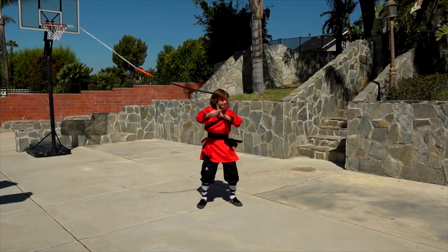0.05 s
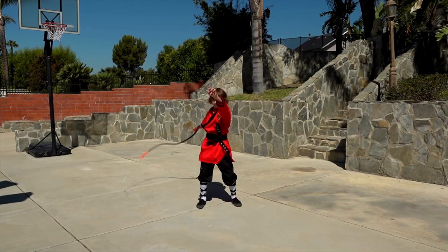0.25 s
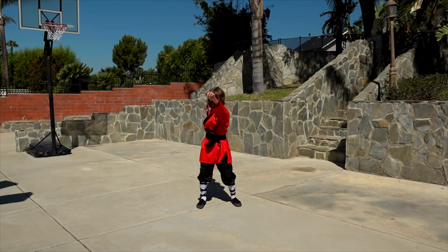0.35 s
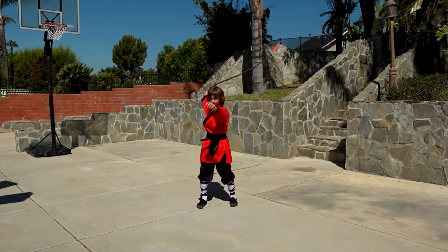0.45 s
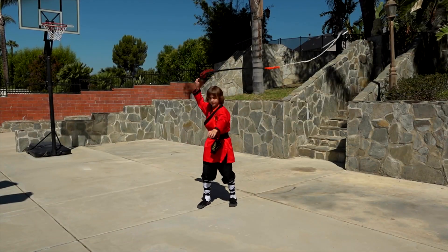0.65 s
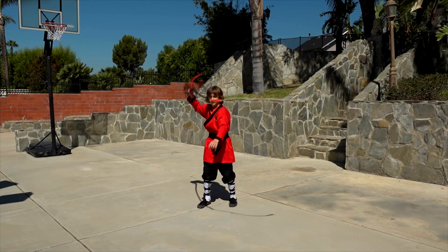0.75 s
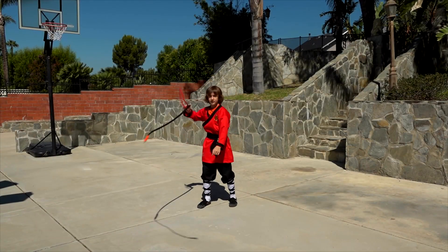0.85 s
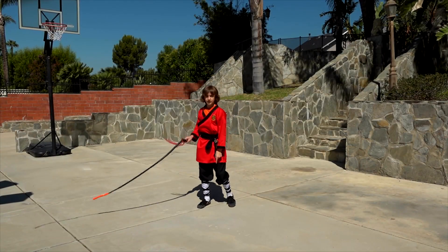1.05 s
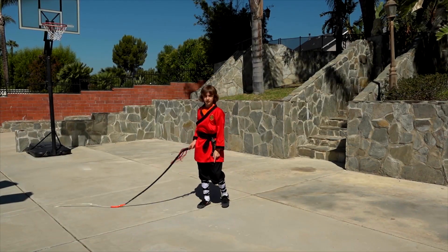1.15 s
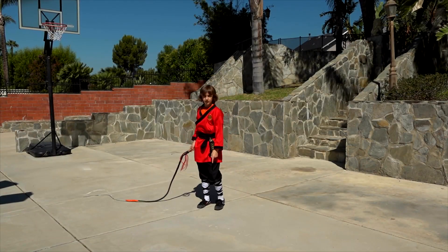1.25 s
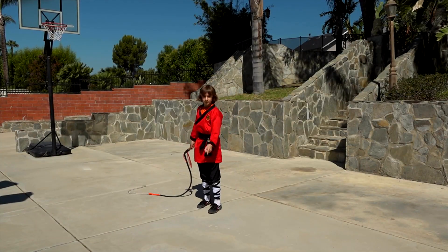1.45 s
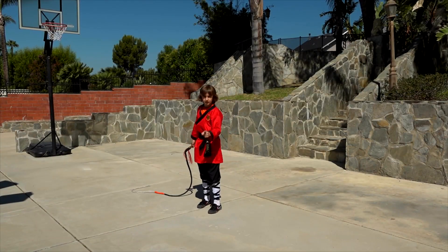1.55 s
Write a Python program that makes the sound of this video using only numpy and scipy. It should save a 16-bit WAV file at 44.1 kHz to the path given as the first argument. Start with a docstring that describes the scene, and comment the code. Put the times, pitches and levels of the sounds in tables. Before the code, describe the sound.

A whip swishes and cracks once, loud enough to overload the microphone, and echoes around a walled concrete yard. The lash then drops, faintly scuffing and tapping on the ground, over a low motor hum and light wind.

```python
"""A walled concrete yard: the echo of an earlier, duller crack dies over a wavering motor hum, light
wind and faint hiss. A whip lash rushes up and cracks at 0.23 s, overloading the microphone; the walls
ring on and farther walls send two late echoes. Two faint far-off tones swell just after 1 s.
From 1.23 s the lash drops on the concrete: it drags, scuffs, taps, and its heavier end knocks."""
import sys
import numpy as np
from scipy import signal
from scipy.fft import rfft, irfft
from scipy.io import wavfile

SR = 44100
rng = np.random.default_rng(int(sys.argv[2]) if len(sys.argv) > 2 else 0)


def store_pcm(level_fs):
    """Save levels as 16-bit WAV."""
    pcm = np.round(np.clip(level_fs, -1, 1) * 32767).astype(np.int16)
    wavfile.write(sys.argv[1], SR, np.atleast_2d(pcm).T)


N = 70560
TIME_S = np.arange(N) / SR
CONTACT_S = TIME_S[:8192]  # time axis of one ground contact

# yard decay: f/Hz, T60/s
YARD_T60 = [(60, .4), (250, 0.61), (1000, 0.62), (3000, .68), (6000, .62), (9000, 0.49), (12000, 0.48),
            (16000, 0.43)]
# echo spectrum of the earlier crack: f/Hz, level/dB
EARLY_ECHO_SPECTRUM = [(120, -53), (200, -18), (537, -7), (634, -18), (897, -7.5), (1940, -11),
                       (4250, -2.5), (9510, -19), (15900, -44)]
# motor partials: harmonic number, level/dB
HUM_PARTIALS = [(1, -49), (2, -37.5), (3, -53.5), (4, -49), (5, -61), (6, -57.5)]
# wind rumble: f/Hz, level/dB
WIND_SPECTRUM = [(12, -35.5), (22, -3.5), (55, 0.5), (100, -13), (200, -34.5), (400, -61.5)]
# wind envelope: t/s, level/dB
WIND_ENVELOPE = [(0.0, -33.5), (0.208, -44), (0.404, -35), (0.53, -33.5), (0.68, -41), (0.854, -39.5),
                 (1.06, -30.5), (1.136, -31.5), (1.6, -34)]
# outdoor hiss: f/Hz, level/dB
HISS_SPECTRUM = [(71, -36.5), (120, -3.5), (362, -18), (523, -20), (655, -19.5), (755, -22), (1290, -24.5),
                 (8090, -43), (15900, -50)]
# lash rushing up to the crack: t/s, thump level/dB, swish level/dB
LASH_ENVELOPE = [(0.132, -41, -49), (.16, -41.5, -47), (.198, -35.5, -38.5), (0.204, -37, -37.5),
                 (.217, -14, -22.5), (.222, -15, -26), (.2255, -7.5, -12.5), (.229, 3, -12),
                 (0.235, -4.5, -1.5), (0.237, -10.5, -8), (0.248, -7, -36.5), (.26, -63.5, -55.5)]
# air thump of the lash: f/Hz, level/dB
THUMP_SPECTRUM = [(30, -7), (90, 0), (250, -10), (470, 1.5), (800, -8.5), (1300, -11), (2100, -10.5),
                  (3500, -19), (16000, -45)]
# swish of the lash: f/Hz, level/dB
SWISH_SPECTRUM = [(500, -48.5), (3000, -23), (7500, -7), (11000, -13), (16000, -16.5)]
# echo spectrum of the crack: f/Hz, level/dB
CRACK_ECHO_SPECTRUM = [(35, -40), (60, 2.5), (200, -3), (700, 1.5), (1470, 2), (2600, -1), (4100, -2.5),
                       (5800, 2), (8000, -0.5), (10200, -6), (13000, -14), (16000, -21.5)]
# single echoes from farther walls: t/s, level/dB
FAR_ECHOES = [(.394, -8.5), (0.435, -19)]
# their spectrum: f/Hz, level/dB
FAR_ECHO_SPECTRUM = [(300, -11), (2000, -13), (6000, -1), (10000, -10), (16000, -24)]
# far-off tones: t/s, length/s, level/dB, f/Hz
FAR_TONES = [(1.033, 0.11, -50, 637), (1.071, 0.14, -49, 449)]
# lash dragging: t/s, level/dB
DRAG_ENVELOPE = [(1.228, -87), (1.234, -35.5), (1.3, -55.5), (1.36, -66), (1.4, -48.5), (1.5, -46.5),
                 (1.6, -58)]
# drag noise: f/Hz, level/dB
DRAG_SPECTRUM = [(300, -12), (1000, -6), (2500, -12.5), (6000, -3), (12000, -22), (16000, -22)]
# lash scuffs: t/s, length/s, level/dB, centre f/Hz, width/octaves
LASH_SCUFFS = [(1.231, 0.016, -41, 11000, .5), (1.246, 0.021, -36, 4380, .35),
               (1.246, 0.018, -37, 11000, .3), (1.265, 0.04, -37, 5300, 0.62),
               (1.268, 0.027, -37, 11200, .2), (1.295, 0.055, -47, 5500, 0.47),
               (1.373, 0.011, -40, 11000, 0.17), (1.405, 0.045, -45, 5300, 0.71),
               (1.412, 0.022, -47, 11500, 0.13), (1.425, 0.029, -49, 13000, .25),
               (1.448, 0.047, -38, 7140, 0.31), (1.49, .04, -60, 6500, 0.3),
               (1.525, 0.067, -42, 5430, 0.59), (1.528, 0.035, -51, 11700, 0.12),
               (1.578, .03, -50, 6200, .3)]
# lash taps: t/s, level/dB, centre f/Hz, width/octaves
LASH_TAPS = [(1.2316, -30.5, 4600, 0.47), (1.2358, -34, 5000, 1.2), (1.2533, -34, 2200, 0.86),
             (1.3739, -32.5, 5040, .5), (1.3914, -32.5, 8000, .9), (1.4156, -35.5, 5500, .6),
             (1.4503, -39, 3000, 1.1), (1.5228, -43, 5960, .5)]


def amp(db):
    return 10 ** (np.asarray(db) / 20)


def unit_rms(x):
    return x / np.sqrt(np.mean(x ** 2) + 1e-20)


def at_hz(table, hz):
    """Table value, interpolated over log frequency."""
    table_hz, value = np.transpose(table)
    return np.interp(np.log(hz + 1), np.log(table_hz + 1), value)


def noise(spectrum):
    """Noise of the given spectral shape, rms 1."""
    gain = amp(at_hz(spectrum, np.fft.rfftfreq(N, 1 / SR)))
    return unit_rms(irfft(rfft(rng.standard_normal(N)) * gain, N))


def bandpass(x, centre_hz, octaves):
    """Bell-shaped band over log frequency, rms 1."""
    hz = np.fft.rfftfreq(len(x), 1 / SR) + 1
    bell = np.exp(-.5 * (np.log2(hz / centre_hz) / octaves) ** 2)
    return unit_rms(irfft(rfft(x) * bell, len(x)))


def drift(top_hz):
    """Random wavering from 1 Hz to top_hz, rms 1."""
    rates_hz = np.geomspace(1, top_hz, num=16)
    return unit_rms(sum(np.sin(2 * np.pi * (hz * TIME_S + rng.random())) for hz in rates_hz))


def placed(x, start_s):
    return np.pad(x, (round(start_s * SR), N))[:N]


def wall_echoes(spectrum, start_s, level_db, rise_s):
    """Dense reflections build up, then each band decays at the yard's T60."""
    hz, t, bands = signal.stft(noise(spectrum), SR, nperseg=256, noverlap=192)
    decay = amp(-60 * np.maximum(t - start_s, 0) / at_hz(YARD_T60, hz)[:, None])
    tail = signal.istft(bands * decay, SR, nperseg=256, noverlap=192)[1][:N]
    return amp(level_db) * np.clip((TIME_S - start_s) / rise_s, 0, 1) * tail


def motor_hum(pitch_hz=47.5, pitch_waver=0.021, waver_db=2.5):
    """Motor harmonics waver together in pitch, separately in level."""
    cycles = np.cumsum(pitch_hz * (1 + pitch_waver * drift(top_hz=5.5))) / SR
    hum = np.zeros(N)
    for harmonic, db in HUM_PARTIALS:
        peak = np.sqrt(2) * amp(db + waver_db * drift(top_hz=8))
        hum += peak * np.sin(2 * np.pi * (harmonic * cycles + rng.random()))
    return hum


def wind(gust_db=2.0):
    """Low rumble with gusts."""
    level_db = np.interp(TIME_S, *np.transpose(WIND_ENVELOPE)) + gust_db * drift(top_hz=33)
    return amp(level_db) * noise(WIND_SPECTRUM)


def outdoor_hiss(level_db=-43.5):
    """Steady noise floor."""
    return amp(level_db) * noise(HISS_SPECTRUM)


def lash_rush():
    """Air thump and swish as the tip speeds up and snaps."""
    t, thump_db, swish_db = np.transpose(LASH_ENVELOPE)
    thump = amp(np.interp(TIME_S, t, thump_db, -99, -99)) * noise(THUMP_SPECTRUM)
    swish = amp(np.interp(TIME_S, t, swish_db, -99, -99)) * noise(SWISH_SPECTRUM)
    return thump + swish


def shock(start_s=.225, cycle_s=.0125):
    """Deep pressure swing of the crack: suction, then push."""
    progress = np.clip((TIME_S - start_s) / cycle_s, 0, 1)
    return -np.sin(2 * np.pi * progress) * np.sin(np.pi * progress) ** .5


def far_echoes(rise_s=.003, t60_s=0.11):
    """Farther walls return the crack as short, late bursts."""
    envelope = np.zeros(N)
    for start_s, db in FAR_ECHOES:
        age_s = np.maximum(TIME_S - start_s, 0)
        envelope += amp(db - 60 * age_s / t60_s) * np.minimum(age_s / rise_s, 1)
    return envelope * noise(FAR_ECHO_SPECTRUM)


def far_tones():
    """Soft swells, each of one pitch."""
    tones = np.zeros(N)
    for start_s, length_s, db, hz in FAR_TONES:
        swell = np.sin(np.pi * np.clip((TIME_S - start_s) / length_s, 0, 1))
        tones += amp(db) * swell * np.sin(2 * np.pi * hz * TIME_S)
    return tones


def drag():
    """Continuous friction of the lash on concrete."""
    level_db = np.interp(TIME_S, *np.transpose(DRAG_ENVELOPE), left=-120)
    return amp(level_db) * noise(DRAG_SPECTRUM)


def scuff(start_s, length_s, level_db, centre_hz, octaves, grit_db=5):
    """The lash scrapes over grit: a swell of spiky band noise."""
    grit = rng.standard_normal(len(CONTACT_S))
    grit *= amp(grit_db * np.minimum(rng.exponential(1, len(grit)), 4))
    swell = np.sin(np.pi * np.clip(CONTACT_S / length_s, 0, 1)) ** .6
    return placed(amp(level_db) * swell * bandpass(grit, centre_hz, octaves), start_s)


def tap(start_s, level_db, centre_hz, octaves, t60_s=0.029):
    """The lash hits concrete: a fast-decaying noise burst."""
    burst = bandpass(rng.standard_normal(len(CONTACT_S)), centre_hz, octaves)
    return placed(amp(level_db - 60 * CONTACT_S / t60_s) * burst, start_s)


def knock(start_s=1.2362, level_db=-19.5, hz=570, t60_s=0.0058):
    """The heavier end of the lash lands: one damped tone."""
    envelope = amp(level_db - 60 * CONTACT_S / t60_s)
    return placed(-envelope * np.cos(2 * np.pi * hz * CONTACT_S), start_s)


def lash_on_ground(echo_db=-11.5):
    """All ground contacts, with a little yard echo."""
    taps = sum(tap(*row) for row in LASH_TAPS)
    scuffs = sum(scuff(*row) for row in LASH_SCUFFS)
    direct = drag() + scuffs + taps + knock()
    flat_spectrum = [(200, 0), (16000, 0)]
    yard = wall_echoes(flat_spectrum, start_s=0.0066, level_db=0, rise_s=0.0094)
    return direct + amp(echo_db) * signal.fftconvolve(direct, yard / np.linalg.norm(yard))[:N]


def scene():
    echoes = wall_echoes(CRACK_ECHO_SPECTRUM, start_s=.24, level_db=6.26, rise_s=0.014) + far_echoes()
    early_echo = wall_echoes(EARLY_ECHO_SPECTRUM, start_s=-.02, level_db=-24, rise_s=.005)
    whip = lash_rush() + shock() + echoes + lash_on_ground()
    background = motor_hum() + wind() + outdoor_hiss() + far_tones()
    return (early_echo + whip + background)[None]


def record(dry):
    """The input stage clips hard; a low-pass follows."""
    ceiling, knee, cutoff_hz = 0.67, 18, 15800
    clipped = dry / (1 + abs(dry / ceiling) ** knee) ** (1 / knee)
    lowpass = signal.firwin(511, cutoff_hz, window=("kaiser", 9), fs=SR)
    return signal.oaconvolve(clipped, lowpass[None], "same")


dry = scene()
out = record(dry)
store_pcm(out)
```